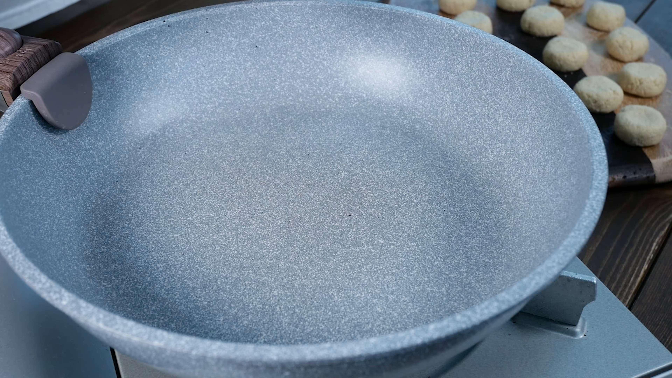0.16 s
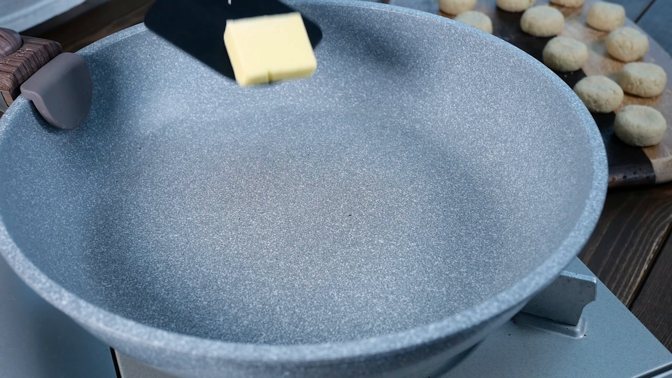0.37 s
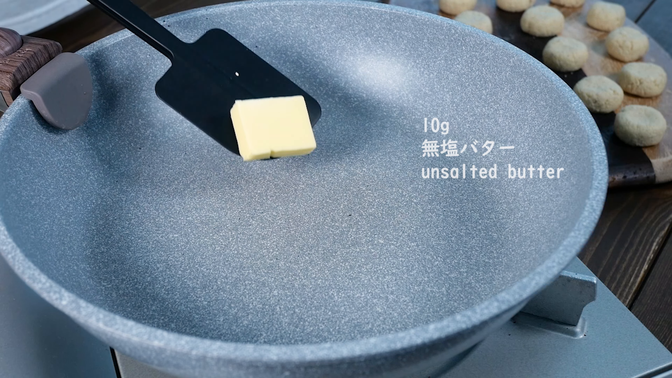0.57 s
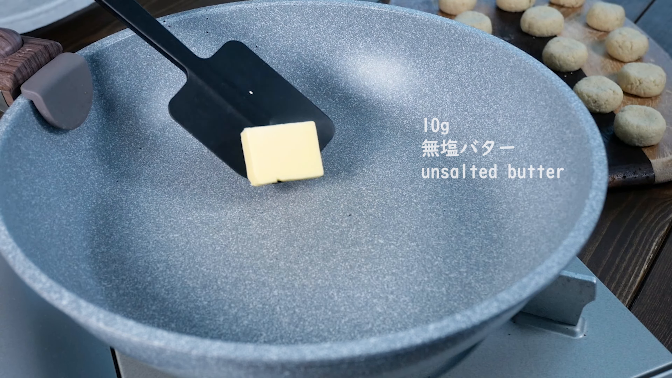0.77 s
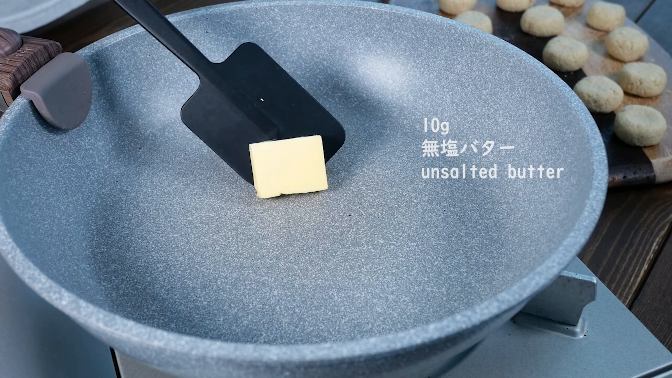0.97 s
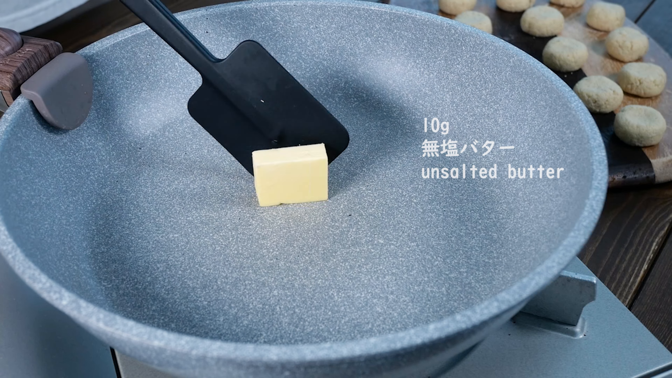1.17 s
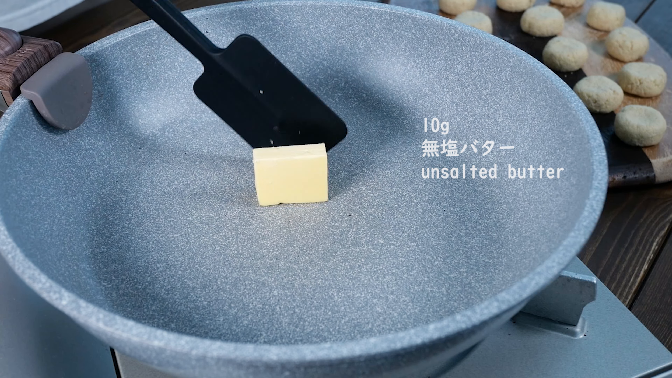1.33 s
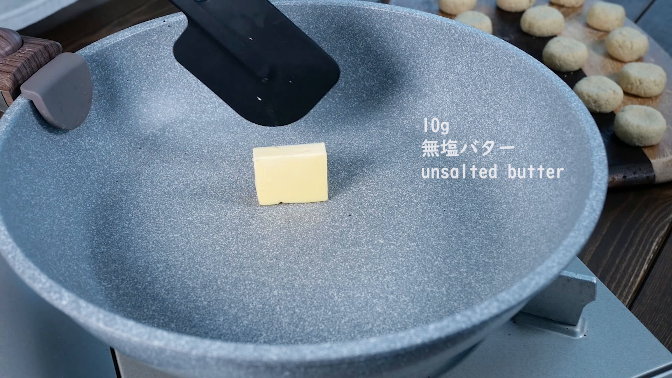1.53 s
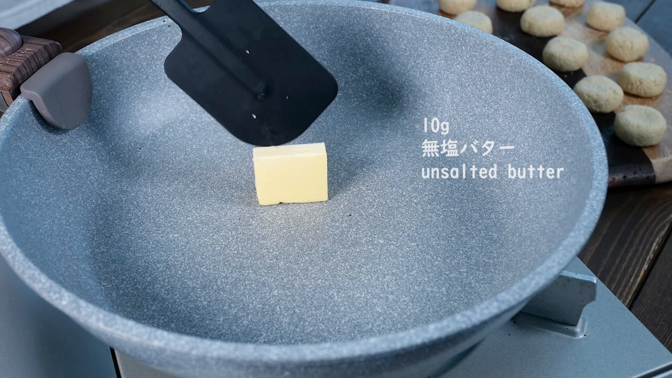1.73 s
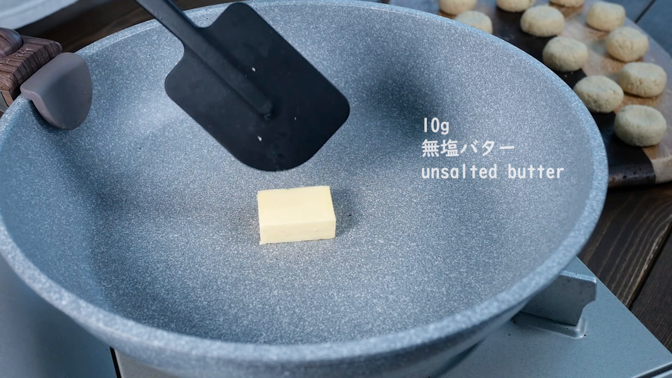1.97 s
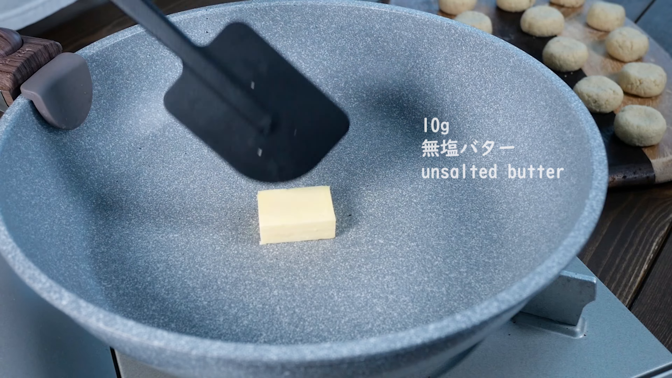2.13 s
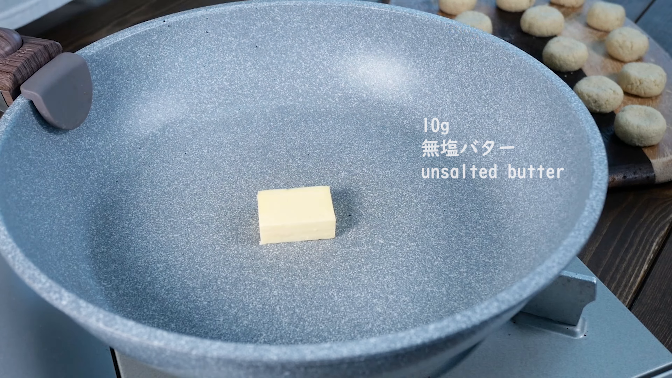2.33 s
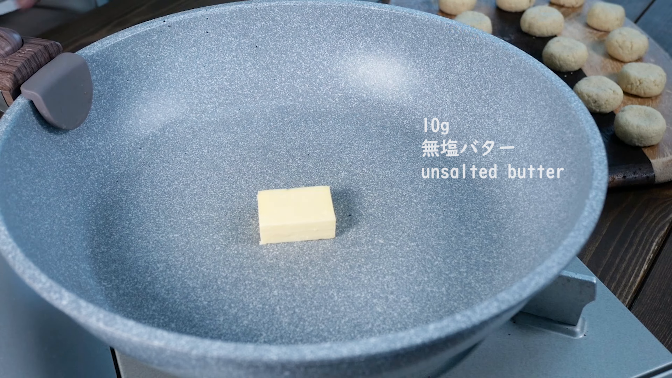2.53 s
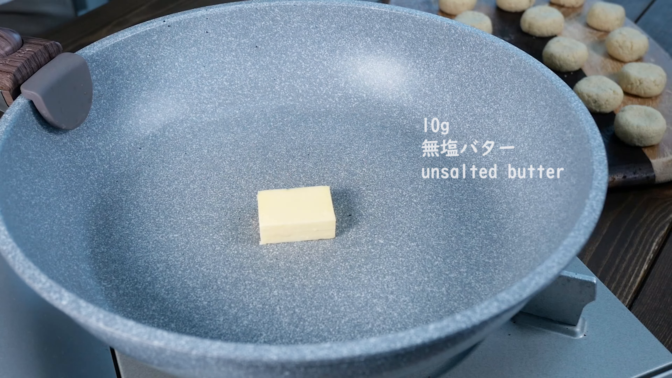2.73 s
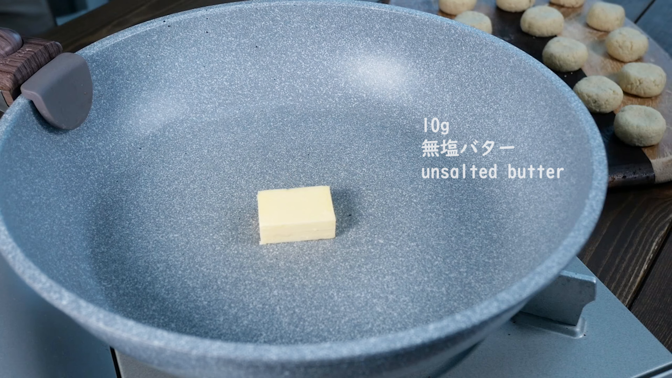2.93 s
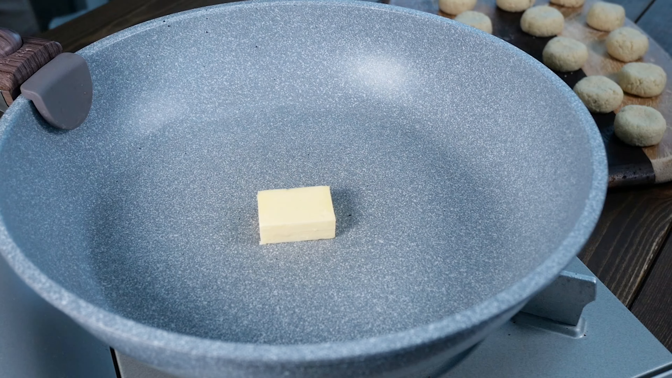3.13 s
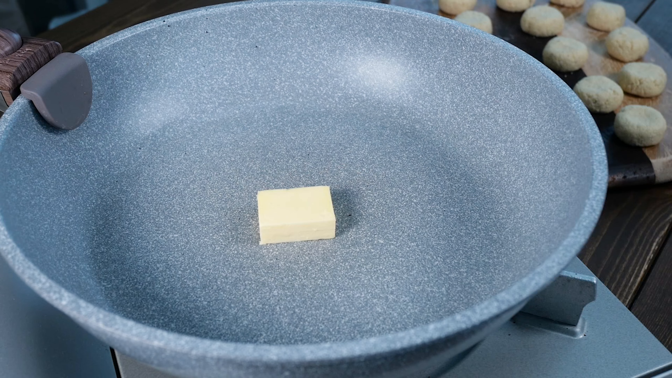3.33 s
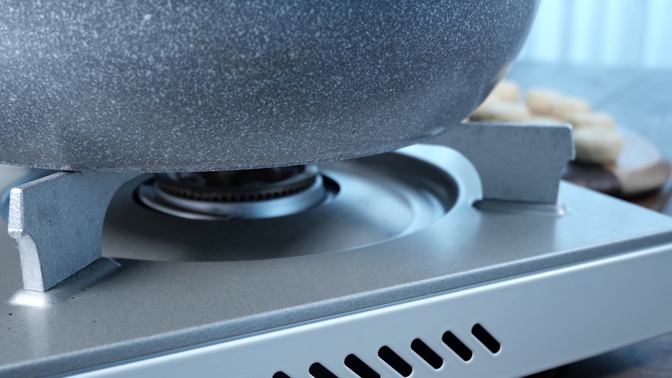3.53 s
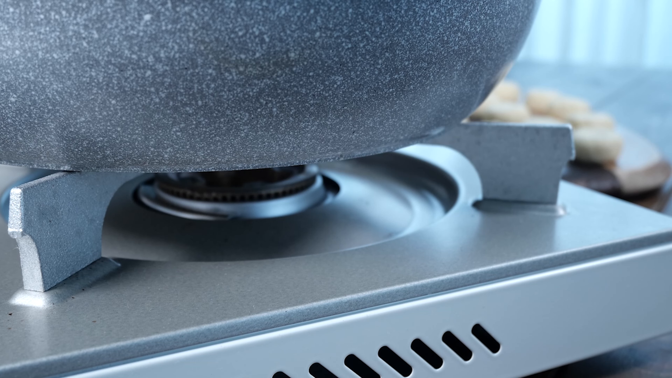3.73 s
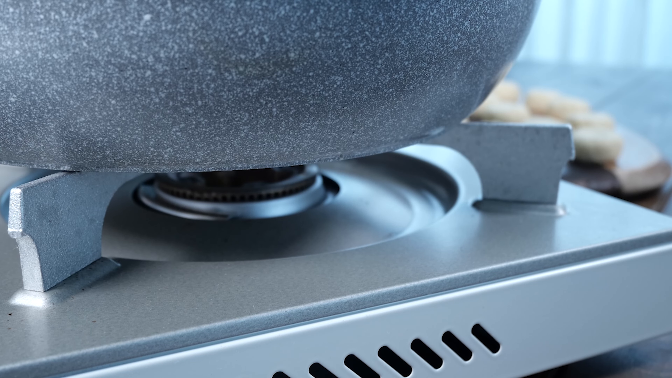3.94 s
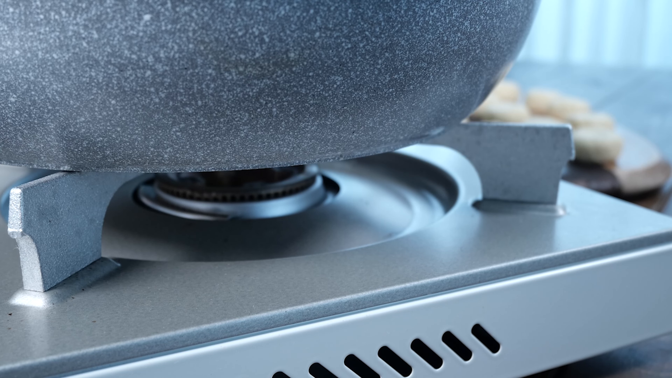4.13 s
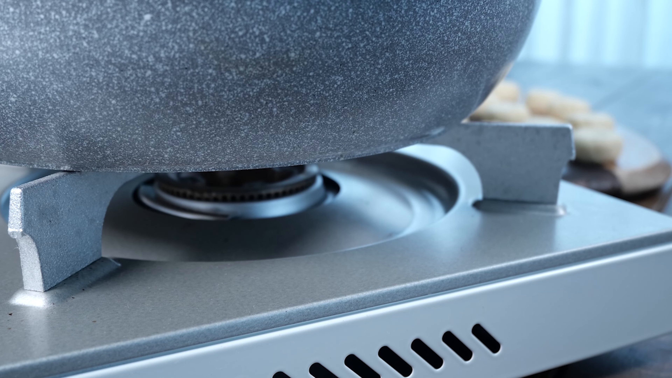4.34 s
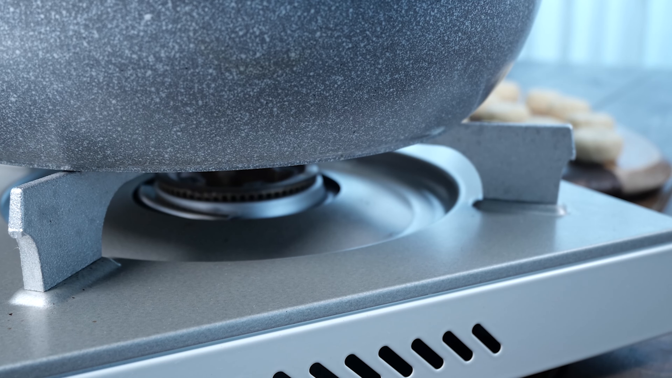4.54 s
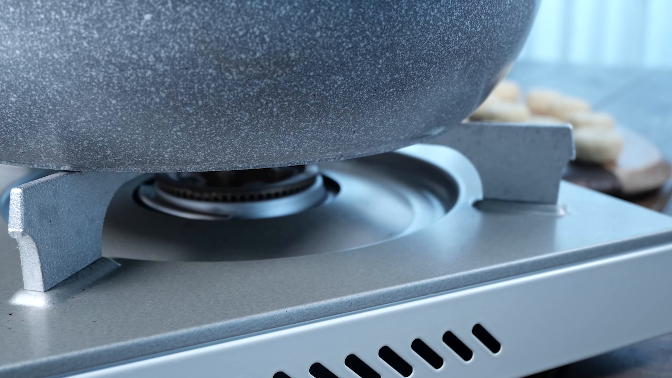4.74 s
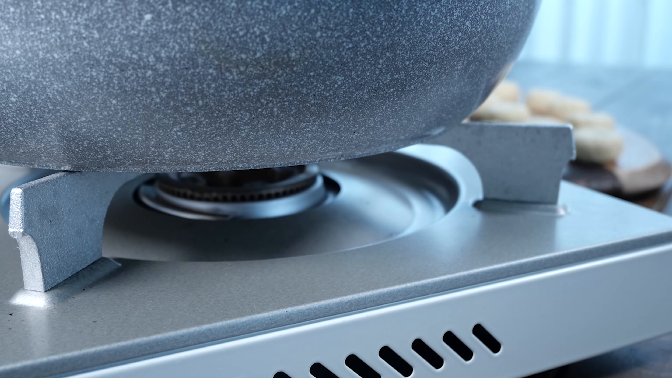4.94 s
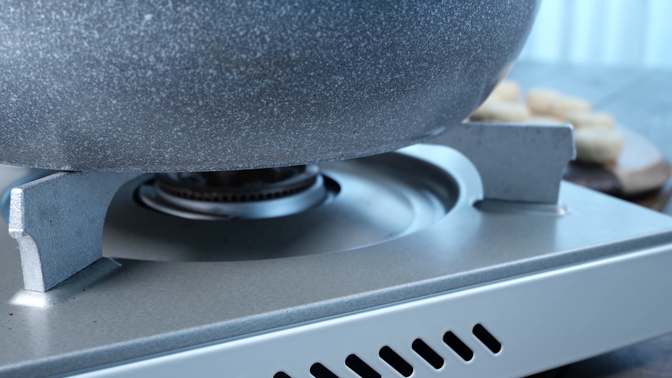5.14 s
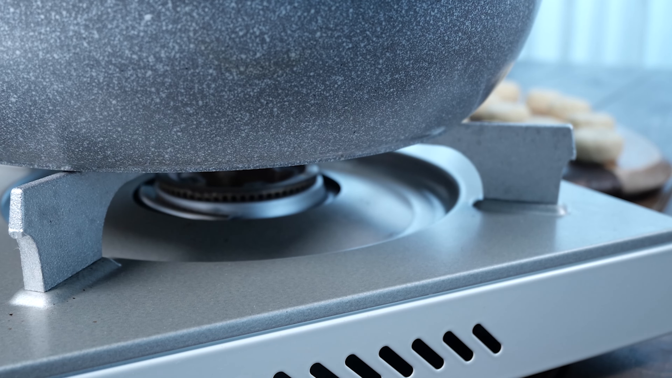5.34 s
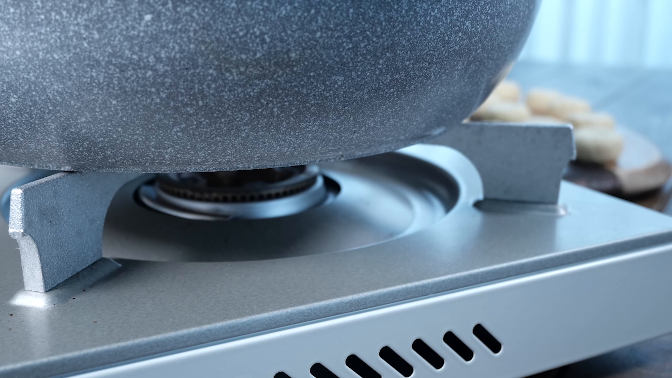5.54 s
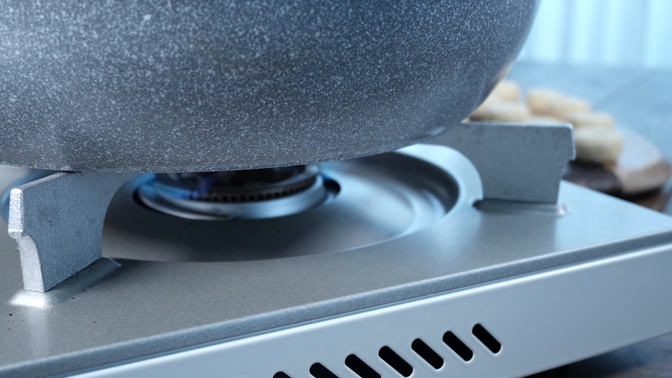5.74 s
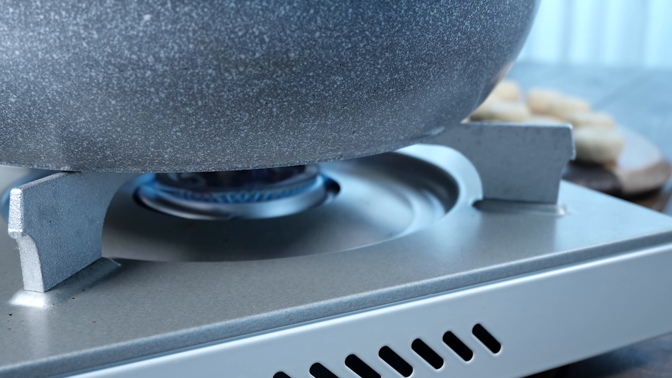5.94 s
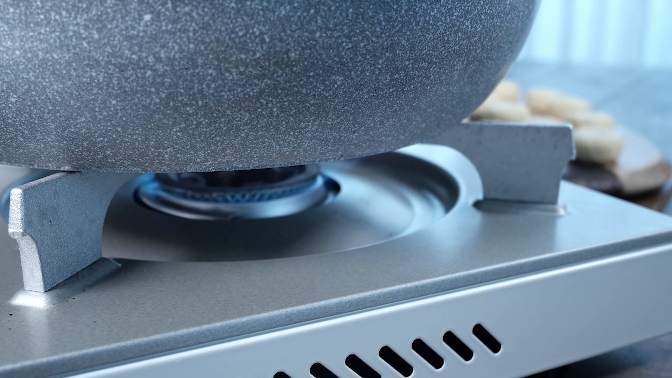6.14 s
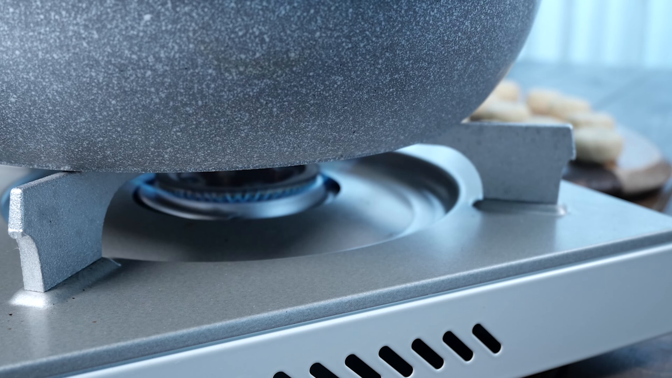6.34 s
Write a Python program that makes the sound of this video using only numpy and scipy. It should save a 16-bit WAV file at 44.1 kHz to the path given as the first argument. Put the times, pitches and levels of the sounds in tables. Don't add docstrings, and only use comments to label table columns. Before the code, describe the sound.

A quiet kitchen heard close, with dull air tone and a barely audible high whine at first. Near 1.0 s a spatula edge lands lightly in a coated pan, with a fainter tap after it and a tiny scrape around 1.35. At 2.04 one firm knock rings the pan briefly, mostly damped. A bright tick at 2.44 and a short sleeve swish at 2.6 follow, then near silence. From 3.86 to 4.2 a hand knocks and creaks the stove's lever, thin sheet metal rattling. At about 4.8 fingers touch the knob; gas hiss rises to about 5.0 with faint squeaks, while clunks and clicks build, a sharp one at 5.31. At 5.5 the igniter cracks, by far among the loudest events. From 5.55 gas catches in fluttering whooshes, strongest near 5.7 and 5.86, with low puffs and crackles, easing after 6.0 with a last flare at 6.17.

```python
import sys
import numpy as np
from scipy import signal
from scipy.fft import rfft, irfft
from scipy.io import wavfile

SR = 44100
rng = np.random.default_rng(int(sys.argv[2]) if len(sys.argv) > 2 else 0)


def to_wav(s):
    ch = np.atleast_2d(s).T
    pcm = np.round(np.clip(ch, -1, 1) * 32767)
    wavfile.write(sys.argv[1], SR, pcm.astype(np.int16))


def voltage_ratio(decibels):
    exponent = np.asarray(decibels, float) / 20
    return 10 ** exponent


N = 282240
T = np.arange(N) / SR

# hz, level_db (per Hz)
ROOM_COLOUR = [(12, -53), (20, -15.5), (120, -12), (222, -2.5), (255, -6), (293, -4.5), (399, -6),
               (434, -4.5), (472, -9.5), (590, -4.5), (1090, -9.5), (2820, -26.5), (7110, -28.5),
               (8180, -29.5), (16000, -33.5)]
ROOM_DB = -57.5
# from_s, to_s
WHINE_TIMES = [(0, .67), (1.78, 2.05)]
WHINE_HZ, WHINE_DB = 7870, -78
# hz, t60_s
KITCHEN_DECAY = [(250, 0.45), (800, 0.3), (2100, 0.32), (5500, 0.24), (14000, 0.2)]

# peak_s, level_db, rise_db_per_s, fall_db_per_s
BRUSHES = [
    (0.454, -78, 45, 32),
    (2.618, -67.5, 36, 31),
    (4.186, -60.5, 50, 75),
    (4.788, -55.5, 210, 102),
]
# hz, level_db (per Hz)
CLOTH_COLOUR = [(1200, -20), (2500, -1), (6000, -5.5), (11000, -10.5), (15500, -17)]
# peak_s, level_db, rise_db_per_s, fall_db_per_s
THIN_SWISH = (2.625, -56, 250, 110)
SWISH_LOWEST_HZ = 5500

# start_s, level_db, centre_hz, length_ms
SCRATCHES = [
    (.975, -43.5, 5200, 2.1),
    (1.335, -61, 5000, 30),
    (1.375, -55, 4020, 12),
    (1.39, -52.5, 3470, 4.7),
    (2.421, -52, 5900, 1.9),
    (2.441, -37.5, 4800, 1.7),
    (2.452, -50.5, 4500, 11),
    (4.787, -31.5, 3900, 8.5),
    (4.789, -37.5, 12000, 4.8),
    (5.236, -29.5, 7400, 2.9),
]
# start_s, peak_db
FIRM_KNOCKS = [
    (2.043, -6.5),
]
# start_s, level_db
LIGHT_TAPS = [
    (.975, -38.5),
    (1.077, -47.5),
]
# hz, level_db, t60_s
LIGHT_RING = [(322, -5, 0.039), (651, -1, 0.11), (1300, -11.5, 0.055)]
PAN_PITCHES = [361, 612, 640, 770, 960, 1180, 1289, 1310, 1510, 1700, 1870, 2120, 2360, 2395, 2520, 2690,
               3200, 3620, 3715, 3960, 4330, 4850, 5390, 6150, 6600, 7400, 8400, 9600, 12500]
# level_db, t60_s
PAN_DAMPING = [(-30, 0.66), (-46, 0.17), (-8.5, 0.056), (-9, 0.024), (-12, 0.031), (-13, 0.015),
               (-11, 0.21), (-2.5, 0.021), (-8.5, 0.021), (-20, 0.017), (-7.5, 0.012), (-41, 0.46),
               (-44.5, 0.79), (-37, 0.48), (-19, 0.04), (-13.5, 0.059), (-38, 0.16), (-19, 0.067),
               (-22, 0.086), (-45, 0.044), (-46, 0.072), (-43.5, .05), (-30, 0.092), (-36.5, 0.084),
               (-44, 0.088), (-30, 0.055), (-30.5, 0.047), (-46.5, .05), (-21, 0.043)]

# start_s, peak_db, treble_db, rattle_ms, centre_hz
STOVE_KNOCKS = [(3.859, -33, -49.5, 3, 634), (3.898, -45, -72, 5, 605), (4.159, -20, -40.5, 3, 1070),
                (4.1711, -17.5, -51, 1.7, 840), (4.183, -29, -62, 3.3, 840),
                (4.756, -30.5, -42.5, 3.9, 845), (4.879, -35.5, -41, 9.4, 1300),
                (5.118, -25, -36.5, 7.5, 1010), (5.221, -20, -35, 7.5, 900), (5.311, -11, -17, 2.7, 933),
                (5.379, -27.5, -41, 4.7, 1005), (5.477, -34, -48, 11, 790), (5.507, -14.5, -29, 5.6, 970)]
# hz, level_db, t60_s
BODY_MODES = [(523, -13, 0.057), (580, -7, 0.02), (774, -7, 0.017), (876, -7, 0.017), (1048, -2, 0.0094),
              (1381, -7, 0.02), (1660, -1, 0.011), (1885, -6.5, 0.019), (2850, -8, 0.008)]
# hz, width_hz, level_db
SNAP_BANDS = [(2110, 340, 10), (3200, 1260, 3), (5500, 1300, -0.5), (7300, 1200, -5), (8400, 1300, -24),
              (12000, 830, -25), (13280, 5300, -12)]
# start_s, level_db, centre_hz
TABLE_THUDS = [
    (2.047, -46.5, 132),
    (5.153, -39.5, 140),
    (5.231, -33.5, 158),
    (5.309, -40, 110),
    (5.341, -33, 200),
    (5.384, -28, 255),
    (5.508, -53, 60.4),
    (5.542, -39, 220),
]
# peak_s, level_db, rise_db_per_s, fall_db_per_s
LEVER_CREAKS = [
    (3.875, -50, 300, 200),
    (3.935, -45, 400, 900),
    (4.025, -51, 300, 200),
    (4.054, -41, 500, 600),
    (4.765, -46, 2000, 90),
    (5.04, -53, 30, 100),
    (5.14, -45, 300, 500),
]

# start_s, rms_db, dying_ms
HAMMER_SNAPS = [
    (5.3092, -23, 3),
    (5.5046, -4, 3.1),
]
# hz, level_db (per Hz)
CRACK_COLOUR = [(290, -40), (500, -13), (880, -3), (1550, -3), (2500, -1), (4090, -4), (5020, -1),
                (6420, -8), (7640, -2), (9500, -12), (11300, -14), (12500, -7), (15100, -6), (16000, -10)]

# hz, level_db (per Hz)
JET_COLOUR = [(1760, 2), (3000, -3), (3170, 1), (3400, -7.5), (4260, -6), (4970, -5.5), (7050, -8),
              (8400, -2.5), (9730, -9), (10800, -20.5), (12600, -21), (13000, -19), (13700, -8),
              (15400, -11), (16000, -36)]
# hz, width_hz, level_db
JET_WHISTLES = [(3200, 45, -3), (4830, 200, -9.5), (7950, 160, -9), (8630, 370, -10.5), (9300, 330, -16),
                (13500, 610, -13)]
# centre_s, pitch_hz, level_db, length_s
STEM_SQUEAKS = [
    (5.07, 3130, -52, .04),
    (5.10, 5350, -52, .02),
]
SEEP_S, SEEP_DB, SEEP_RISE_DB_S = 4.8, -67, 200
VALVE_FULL_S, FLOW_DB, VALVE_RISE_DB_S, SAG_DB_S = 5.04, -54, 81, 2.5
TOP_BAND_S, TOP_BAND_RISE_DB_S = 5.15, 90

# hz, level_db (per Hz)
ROAR_COLOUR = [(24, -57), (40, -25.5), (209, -5.5), (386, -4.5), (423, -3), (469, -3), (521, -3),
               (658, -21.5), (900, -18.5), (1170, -15.5), (1980, -120)]
# hz, width_hz, level_db
GAP_BANDS = [(1023, 55, 9), (1450, 110, 4), (2020, 630, -2.5), (2750, 530, -1.5), (3140, 1080, -5),
             (5430, 230, -41)]
# peak_s, roar_db, flutter_db
FLAME_FLARES = [
    (5.56, -32.5, -29.5),
    (5.716, -30.5, -32),
    (5.778, -58, -58),
    (5.858, -31, -33.5),
    (6.058, -48, -43.5),
    (6.134, -58, -58),
    (6.172, -34, -39.5),
]
STEADY_ROAR_DB, ROAR_RISE_DB_S, ROAR_FALL_DB_S = -39.5, 293, 63
STEADY_FLUTTER_DB, FLUTTER_RISE_DB_S, FLUTTER_FALL_DB_S = -55, 402, 126
# start_s, level_db, thump_hz
GAS_PUFFS = [(5.63, -33.5, 113), (5.649, -32.5, 79), (5.688, -42, 405), (5.713, -16, 444),
             (5.743, -31, 435), (5.778, -39, 304), (5.857, -32, 385), (5.874, -31, 350), (5.961, -30, 440),
             (6.173, -24.5, 356), (6.18, -53, 395)]
# start_s, peak_db
FRONT_CRACKLES = [(5.649, -22), (5.701, -26), (5.716, -26), (5.777, -24), (5.856, -22), (5.876, -25),
                  (5.888, -30), (6.048, -36), (6.066, -37), (6.074, -34), (6.091, -46), (6.132, -34),
                  (6.144, -37), (6.17, -33), (6.18, -32.5), (6.208, -32), (6.248, -34), (6.269, -36.5)]
CRACKLE_GAIN_DB, CRACKLE_MS = 12.5, 3.0
CANCEL_HZ, CANCEL_WIDTH_HZ, CANCEL_DEPTH = 4330, 370, 0.59


def rms_one(x):
    return x / np.sqrt(np.mean(x ** 2) + 1e-20)


def peak_one(x):
    return x / np.max(np.abs(x))


def at_hz(points, hz):
    curve = np.array(points)
    return np.interp(np.log(hz), np.log(curve[:, 0]), curve[:, 1])


def coloured(spectrum):
    hz = np.maximum(np.fft.rfftfreq(N, 1 / SR), 1)
    white = rfft(rng.standard_normal(N))
    return rms_one(irfft(white * voltage_ratio(at_hz(spectrum, hz)), N))


def drift(rate_hz):
    r = np.exp(-2 * np.pi * rate_hz / SR)
    wander = signal.lfilter([1], [1, -2 * r, r * r], rng.standard_normal(N + SR))
    return rms_one(wander[SR:])


def swell_db(s, db, rise_db_s, fall_db_s):
    return db - np.where(T < s, rise_db_s * (s - T), fall_db_s * (T - s))


def swells(rows):
    return np.sqrt(sum(voltage_ratio(2 * swell_db(*row)) for row in rows))


def modes(clicks, table):
    out = 0
    for hz, db, t60 in table:
        r = voltage_ratio(-60 / (t60 * SR))
        w = 2 * np.pi * hz / SR
        ring = [1, -2 * r * np.cos(w), r * r]
        out = out + signal.lfilter([0, voltage_ratio(db) * np.sin(w)], ring, clicks + 1e-18)
    return out


def resonances(x, table, passes=1):
    out = 0
    for k, (hz, width_hz, db) in enumerate(table):
        r = np.exp(-np.pi * width_hz / SR)
        push = (1 - r * r) / 2
        ring = [1, -2 * r * np.cos(2 * np.pi * hz / SR), r * r]
        y = x + 1e-18
        for _ in range(passes):
            y = signal.lfilter([push, 0, -push], ring, y)
        out = out + (-1) ** k * voltage_ratio(db) * y
    return out


def filtered(x, order, hz, kind):
    return signal.sosfilt(signal.butter(order, hz, kind, fs=SR, output="sos"), x)


def radiated(x, hz):
    return filtered(x, 3, hz, "high")


def burst(ms):
    t = np.arange(int(0.15 * SR)) / SR
    rise = np.clip(t / (0.000067 * ms), 0, 1)
    fall = np.exp(-t / (max(ms, 0.3) * 0.0016))
    uneven = voltage_ratio(0.6 * rng.standard_normal(len(t)))
    return rng.standard_normal(len(t)) * uneven * rise * fall


def add(track, s, piece):
    i = round(s * SR)
    track[i:i + len(piece)] += piece[:N - i]


def room_tone():
    whine_on = sum((T > a) & (T < b) for a, b in WHINE_TIMES)
    whine = voltage_ratio(WHINE_DB) * whine_on * np.sin(2 * np.pi * WHINE_HZ * T)
    return voltage_ratio(ROOM_DB) * coloured(ROOM_COLOUR) + whine


def kitchen(x):
    t, tail = np.arange(SR // 2) / SR, 0
    for low in 120 * 2. ** np.arange(7):
        band = filtered(rng.standard_normal(len(t)), 2, [low, 2 * low], "band")
        tail = tail + band * voltage_ratio(-60 * t / at_hz(KITCHEN_DECAY, low * np.sqrt(2)))
    tail = tail * np.clip(t / 0.0028, 0, 1)
    return signal.fftconvolve(x, tail / np.sqrt(np.sum(tail ** 2)))[:N]


def cloth():
    rustle = swells(BRUSHES) * voltage_ratio(2.2 * drift(30)) * coloured(CLOTH_COLOUR)
    swish = swells([THIN_SWISH]) * radiated(rng.standard_normal(N), SWISH_LOWEST_HZ)
    return rustle + swish


def ticks():
    out = np.zeros(N)
    for s, db, hz, ms in SCRATCHES:
        scratch = resonances(burst(ms), [(hz, 0.88 * hz, 0)], passes=2)
        add(out, s, voltage_ratio(db) * peak_one(scratch))
    return out


def spatula():
    firm, light = np.zeros(N), np.zeros(N)
    for s, db in FIRM_KNOCKS:
        add(firm, s, voltage_ratio(db) * np.hanning(7) / 3)
    for s, db in LIGHT_TAPS:
        add(light, s, voltage_ratio(db) * np.hanning(13) / 6)
    pan_modes = [(hz, db, t60) for hz, (db, t60) in zip(PAN_PITCHES, PAN_DAMPING)]
    return radiated(modes(firm, pan_modes), 470) + radiated(modes(light, LIGHT_RING), 200)


def creaks():
    slips = rng.standard_normal(N) * voltage_ratio(1.5 * drift(43))
    body = [(516, 400, -2), (888, 225, 7.0), (1410, 450, -11), (2090, 1200, -21.5)]  # Hz, width Hz, dB
    return swells(LEVER_CREAKS) * rms_one(resonances(slips, body, passes=2))


def stove():
    out = np.zeros(N)
    for s, db, treble_db, ms, hz in STOVE_KNOCKS:
        contact = resonances(burst(ms), [(hz, 0.87 * hz, 0)], passes=2)
        add(out, s, voltage_ratio(db) * peak_one(radiated(modes(contact, BODY_MODES), 330)))
        snap = resonances(burst(2.54 * ms), SNAP_BANDS)
        add(out, s, voltage_ratio(treble_db) * peak_one(snap))
    for s, db, hz in TABLE_THUDS:
        thud = resonances(burst(4.0), [(hz, 2.1 * hz, 0)], passes=2)
        add(out, s, voltage_ratio(db) * peak_one(thud))
    return out + creaks()


def igniter():
    out, t = np.zeros(N), np.arange(SR // 10) / SR
    for s, db, ms in HAMMER_SNAPS:
        rise = np.clip(t / 0.0007, 0, 1)
        fall = np.exp(-np.maximum(t - 0.002, 0) / (ms * 1e-3))
        add(out, s, voltage_ratio(db) * coloured(CRACK_COLOUR)[:len(t)] * rise * fall)
    return out


def jet_hiss():
    jet, edges = coloured(JET_COLOUR), [1500, 4300, 7000, 10500, 12800, 16000]
    hiss = 0
    for k, pair in enumerate(zip(edges, edges[1:])):
        hiss = hiss + (-1) ** k * filtered(jet, 2, pair, "band") * voltage_ratio(2.1 * drift(11))
    whistles = resonances(rng.standard_normal(N), JET_WHISTLES, passes=2)
    hiss = hiss + 6.8 * whistles * voltage_ratio(2.1 * drift(23))
    top = filtered(hiss, 4, 11500, "high")
    low = filtered(hiss, 4, 11500, "low")
    return low + top * voltage_ratio(swell_db(TOP_BAND_S, 0, TOP_BAND_RISE_DB_S, 0))


def gas():
    seep = (SEEP_S, SEEP_DB + 4.5, SEEP_RISE_DB_S, 0)
    flow = (VALVE_FULL_S, FLOW_DB + 5.5, VALVE_RISE_DB_S, SAG_DB_S)
    out = swells([seep, flow]) * jet_hiss()
    for s, hz, db, length in STEM_SQUEAKS:
        squeak = rms_one(resonances(rng.standard_normal(N), [(hz, 260, 0)], passes=2))
        out += voltage_ratio(db) * np.exp(-((T - s) / length) ** 2) * squeak
    return out


def flame():
    unrest = drift(40)
    roar_flares = [(s, db, ROAR_RISE_DB_S, ROAR_FALL_DB_S) for s, db, _ in FLAME_FLARES]
    flutter_flares = [(s, db, FLUTTER_RISE_DB_S, FLUTTER_FALL_DB_S) for s, _, db in FLAME_FLARES]
    roar_gain = np.hypot(voltage_ratio(STEADY_ROAR_DB), swells(roar_flares))
    flutter_gain = np.hypot(voltage_ratio(STEADY_FLUTTER_DB), swells(flutter_flares))
    roar = roar_gain * voltage_ratio(1.4 * unrest) * coloured(ROAR_COLOUR)
    flutter = rng.standard_normal(N) * voltage_ratio(1.6 * unrest + 2.4 * drift(130))
    flutter = flutter_gain * rms_one(flutter) * 3
    swell_in = np.hanning(13230)[:6615] ** 0.085
    for s, db, hz in GAS_PUFFS:
        puff = modes(burst(4.4), [(hz, 0, 2.2 / hz + 0.028)]) * swell_in
        add(roar, s, voltage_ratio(db) * peak_one(puff))
    for s, db in FRONT_CRACKLES:
        add(flutter, s, voltage_ratio(db + CRACKLE_GAIN_DB) * peak_one(burst(CRACKLE_MS)))
    spread = np.clip((T - 5.54) / 0.09, 0, 1)
    return spread * (radiated(roar, 61) + resonances(flutter, GAP_BANDS))


def burner():
    both = gas() + flame()
    return both - CANCEL_DEPTH * resonances(both, [(CANCEL_HZ, CANCEL_WIDTH_HZ, 0)])


def scene():
    pan, hand, spark = spatula() + ticks(), stove(), igniter()
    tail = kitchen(voltage_ratio(-11.5) * pan + voltage_ratio(-6.5) * hand + voltage_ratio(-11.5) * spark)
    mono = room_tone() + tail + cloth() + pan + hand + spark + burner()
    return np.array([mono, mono])


def band_limit(x):
    return signal.sosfilt(signal.butter(12, 16150, fs=SR, output="sos"), x)


def record(dry):
    mono = signal.sosfilt(signal.cheby2(10, 50, 16400, fs=SR, output="sos"), dry[0])
    mono = np.clip(mono, -1, 1)
    hiss = coloured([(100, 0), (800, -2), (4000, 1), (14000, -1), (15800, -8), (16300, -59)])
    trace = voltage_ratio(-34.5) * np.roll(mono, 900) + voltage_ratio(-74) * hiss
    return band_limit(np.array([mono + trace, mono - trace]))


dry = scene()
out = record(dry)
to_wav(out)
```